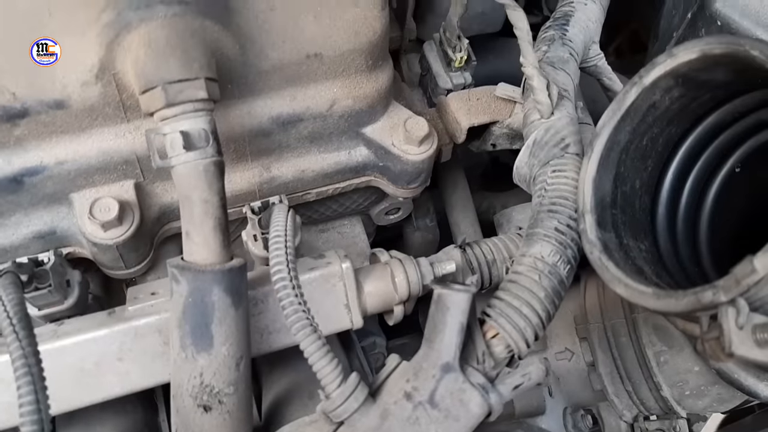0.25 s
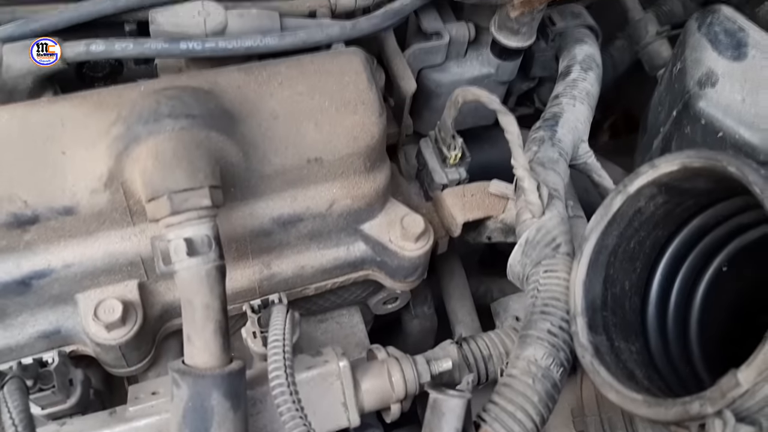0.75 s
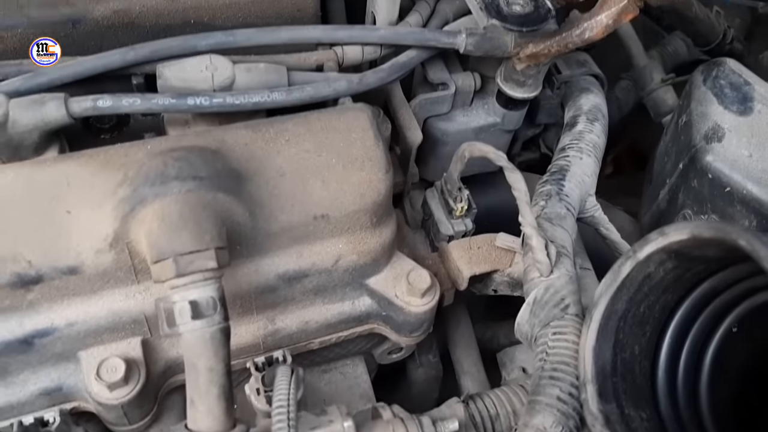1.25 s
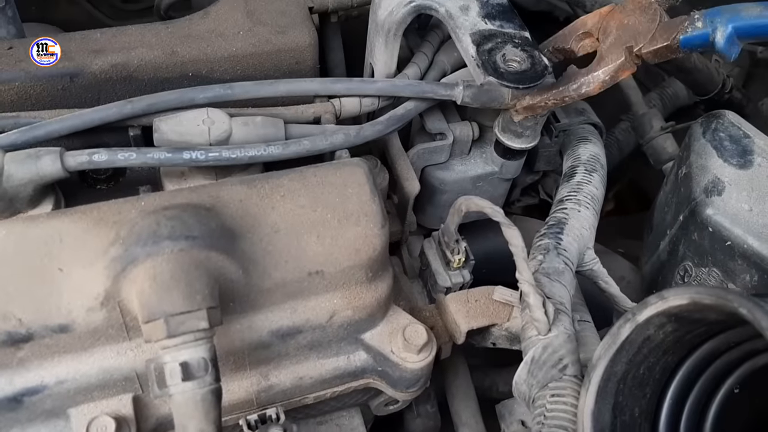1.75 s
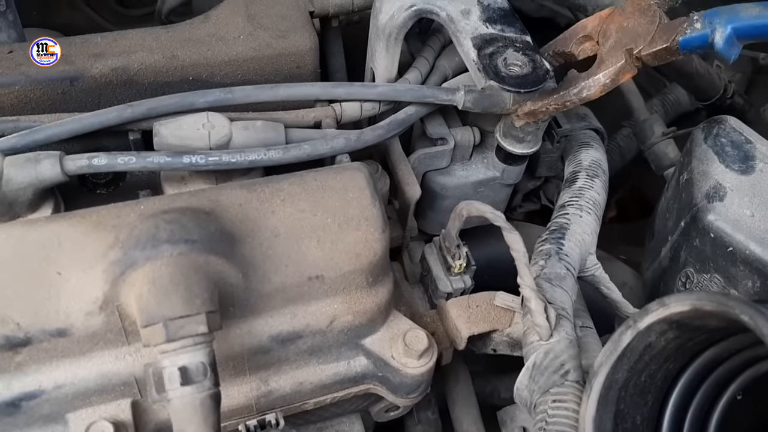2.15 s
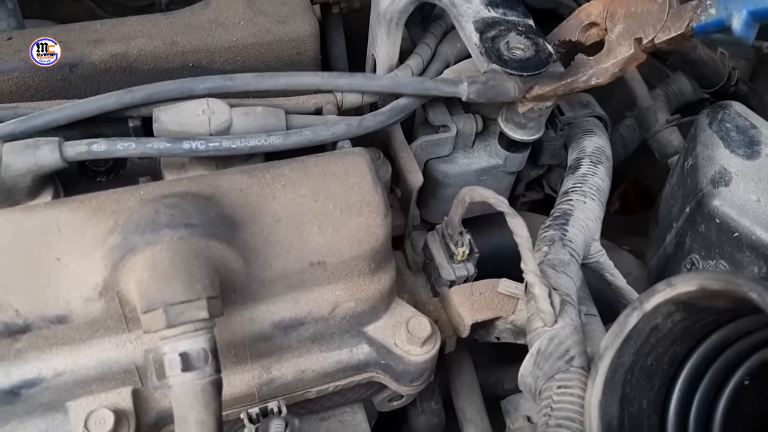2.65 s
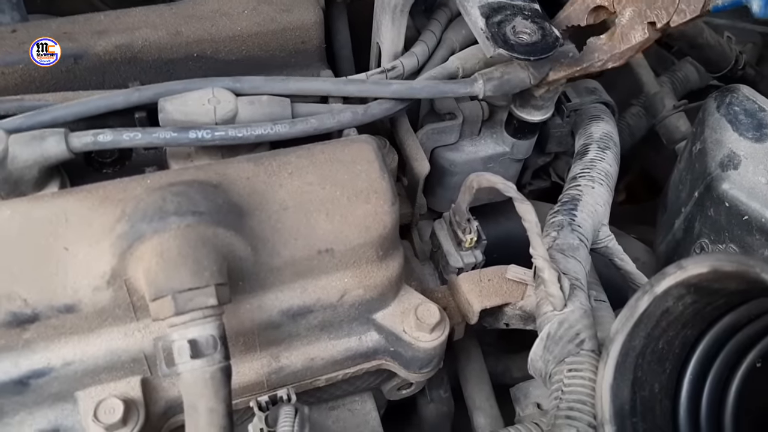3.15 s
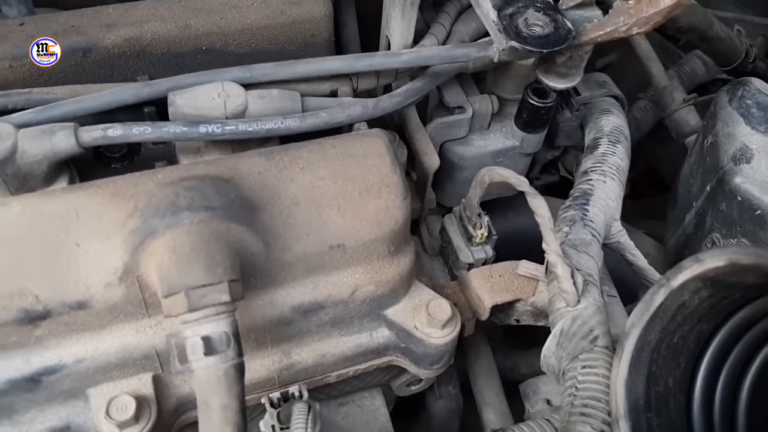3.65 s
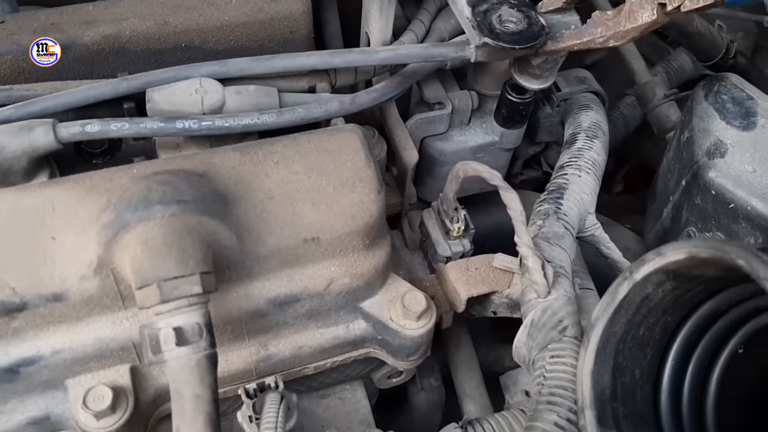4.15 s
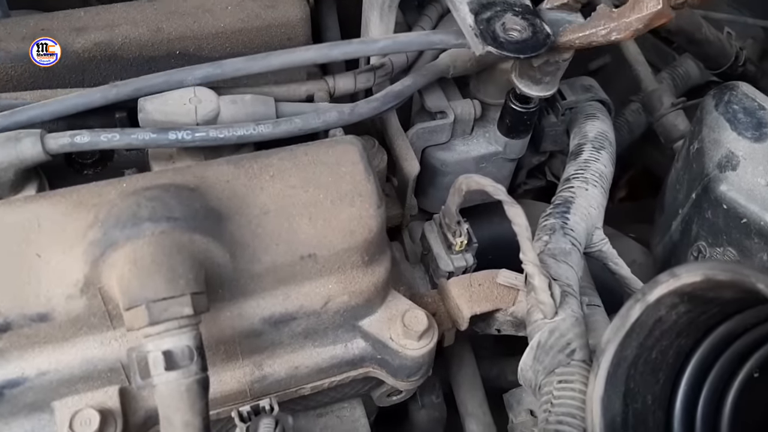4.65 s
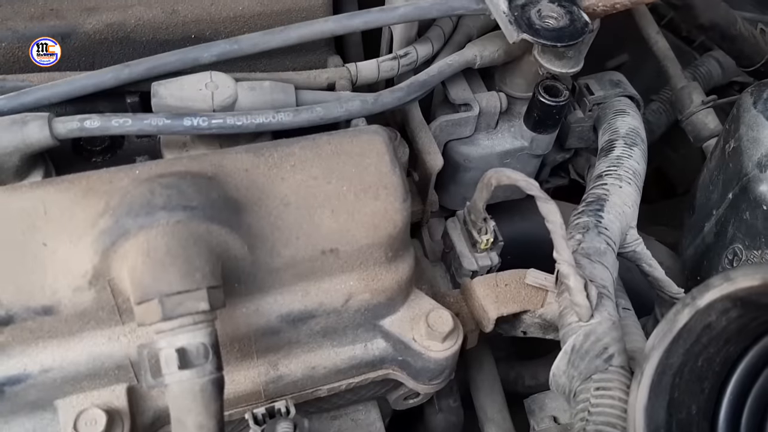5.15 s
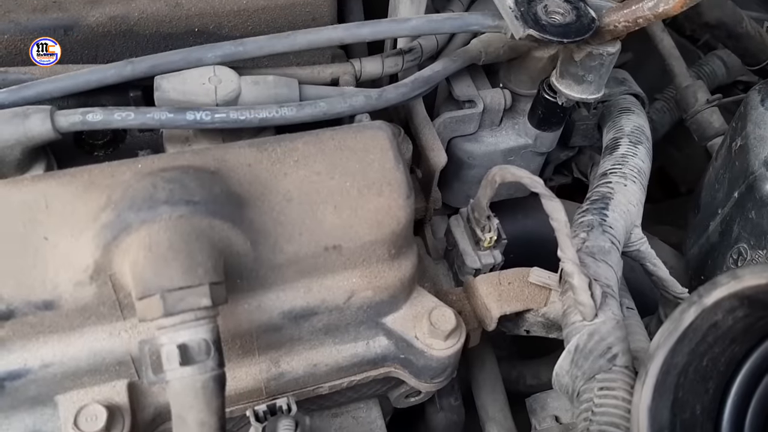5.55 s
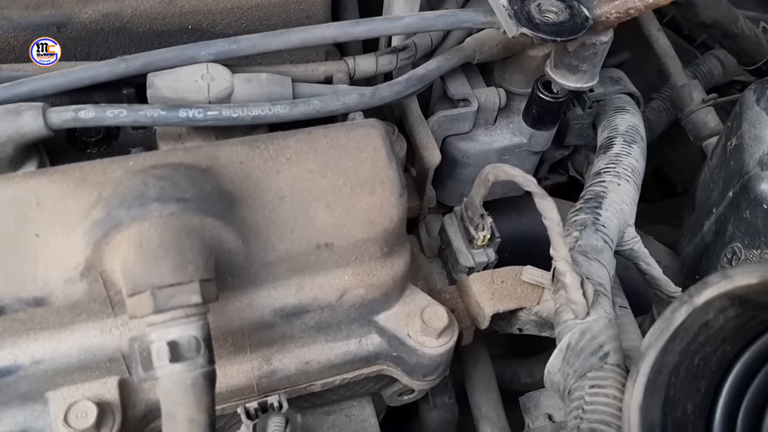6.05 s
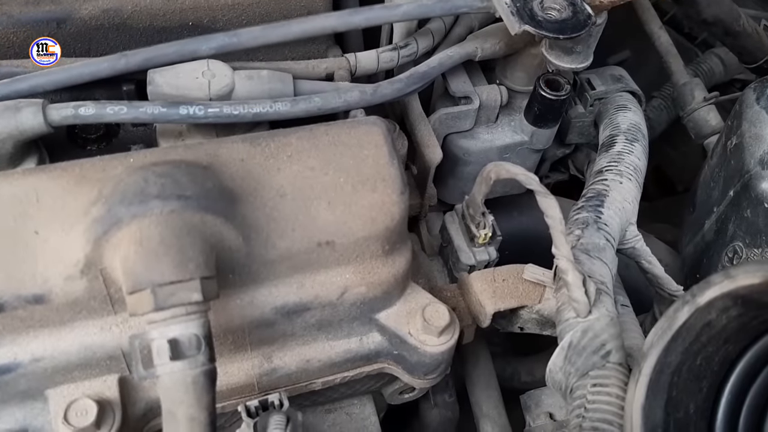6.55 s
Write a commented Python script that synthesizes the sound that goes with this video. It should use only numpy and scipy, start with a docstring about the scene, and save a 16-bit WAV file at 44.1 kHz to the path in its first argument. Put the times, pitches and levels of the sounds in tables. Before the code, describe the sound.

Heard close over an open engine bay, a car engine idles with airy belt noise, light valve knocks and quick injector ticks. Some hollow knocks sound early on. Midway there is a small metallic clink of pliers, followed at once by sharp, evenly spaced cracks of a spark jumping from a loose plug lead. The snapping carries on over the softening idle, which sags a little towards the end.

```python
"""Idling engine with a sparking plug lead.

A four-cylinder petrol engine idles under its open bonnet, heard close above the rocker cover.
Belts and air rush, an accessory hums, valves knock; injectors tick four to a cycle, one of them faint.
A hollow part is bumped now and then. Pliers slip off the boot as a plug lead is pulled off the coil,
and from then on a spark snaps across the gap about twice a cycle."""
import sys
import numpy as np
from scipy import signal
from scipy.fft import rfft, irfft
from scipy.io import wavfile
from scipy.ndimage import uniform_filter1d

SR = 44100
rng = np.random.default_rng(int(sys.argv[2]) if len(sys.argv) > 2 else 0)


def waveform_to_disk(signal):
    """Save audio, clipped to [-1, 1], as 16-bit WAV at the path in sys.argv[1]."""
    frames = np.transpose(np.atleast_2d(signal))
    scaled = np.clip(frames, -1, 1) * 32767
    samples = np.round(scaled).astype(np.int16)
    wavfile.write(sys.argv[1], SR, samples)


N = 299880
T = np.arange(N) / SR
F = np.fft.rfftfreq(N, 1 / SR)
RING_T = T[:int(.12 * SR)]

# Left-right likeness of the noise. Each row: frequency in Hz, coherence 0-1.
COHERENCE = [(30, .72), (70, .94), (150, .9), (600, .93), (1400, .52), (2500, .55), (4500, .38), (9000, .6),
             (16000, .72)]
# Engine speed. Each row: time in seconds, crank speed in rpm.
CRANK_RPM = [(0, 887.6), (1.2, 872.0), (2.5, 842.2), (3.5, 842.1), (5.0, 847.8), (5.8, 852.5), (6.0, 772.4),
             (6.3, 803.5), (6.8, 765.0)]
# Idle levels. Each row: time in seconds, then rush, rumble and rocker cover in dB.
IDLE_LEVELS = [(0, -30, -49, -38), (0.45, -31.5, -47.5, -44), (0.6, -31.8, -49, -40),
               (1.25, -32, -51.5, -42), (1.55, -30.5, -49.5, -43.5), (2.0, -30.5, -50, -37),
               (2.4, -30.5, -49.5, -39.5), (3.0, -30.5, -50, -41), (3.6, -31, -53, -39),
               (3.85, -33, -53, -42.5), (4.35, -36, -61, -45.5), (5.2, -36, -55.5, -46),
               (6.05, -36, -62, -47), (6.45, -36, -52, -41), (6.8, -38, -58, -44)]
# Belt and air noise. Each row: frequency in Hz, relative density in dB.
RUSH_SPECTRUM = [(150, -47), (250, -12.5), (445, -4), (495, -2.5), (559, -12.5), (794, 2), (1600, 2),
                 (2040, 0.5), (3510, -5), (5170, -12.5), (7330, -3.5), (8580, -24), (9500, -10),
                 (12000, -10.5), (15300, -14), (16000, -40)]
# Low engine noise. Each row: frequency in Hz, relative density in dB.
RUMBLE_SPECTRUM = [(15, -57), (25, -40), (48, -67), (68, -25), (81, -11), (146, -8), (251, -8), (275, -9.5),
                   (350, -1), (460, -30), (770, -120)]
# Panels ringing in the rush. Each row: frequency in Hz, width in Hz, level in dB re the rush.
PANEL_MODES = [(2840, 200, -15), (4050, 190, -7), (5030, 160, -14), (9280, 64, -25), (7700, 200, -15)]
# Intake boom swells. Each row: centre in seconds, level in dB, half-width in seconds.
BOOM_SWELLS = [(.19, -32.5, 0.033), (0.39, -41, 0.037), (1.74, -41.5, 0.055), (2.184, -40, 0.094),
               (4.55, -43, 0.041), (5.09, -60, 0.051), (6.472, -46, 0.083), (6.653, -58.5, .04)]
# Accessory tones. Each row: frequency in Hz, relative level in dB.
HUM_TONES = [(500.7, 1), (251, -15.5)]
# Valve knocks and firings. Each row: share of the cycle, length in seconds, frequency in Hz,
# width in Hz, relative level in dB.
BLOCK_KNOCKS = [(0.1224, 0.0054, 1014, 360, -4), (0.093, 0.012, 1330, 190, -10.5),
                (0.109, 0.0079, 2100, 260, -6), (.15, 0.019, 1750, 560, -7), (0.259, 0.015, 854, 220, -8.5),
                (0.321, 0.011, 1360, 280, -10), (0.44, 0.0081, 810, 180, -11),
                (0.588, 0.012, 1280, 240, -7.5), (0.45, 0.055, 97, 49, -31.5), (0.882, 0.034, 200, 34, -28)]
# Injectors in firing order. Each row: share of the cycle, level in dB re the rush, treble gain in dB.
INJECTOR_TICKS = [(0.001, 8, -3.5), (0.236, 6.5, -3), (.5, -1, -14), (0.753, 6.5, -2.1)]
# Fuel rail and clips, mid and treble. Each row: frequency in Hz, width in Hz, relative level in dB.
RAIL_MID_MODES = [(3870, 670, -3.5), (4596, 163, 4.5), (5125, 190, 0), (5360, 660, -3), (6200, 160, -2),
                  (7300, 410, -1)]
RAIL_TREBLE_MODES = [(10150, 640, 8), (12030, 1900, 5), (9800, 3200, -4), (12500, 690, 5),
                     (13700, 480, 2.5)]
# Blows on the hollow part. Each row: time in seconds, level in dB, shell gain in dB.
BLOWS = [(0.151, 0, -7), (0.157, -3, -14), (0.166, -18, 0), (0.176, -17, -4), (0.189, -7, -19),
         (0.196, -24, -13), (0.229, -17, -15), (0.235, -14, -17), (0.407, -19.5, -25), (0.493, -13, -13.5),
         (0.849, -22.5, -15), (1.689, -46, -5), (1.729, -21.5, -14), (2.217, -20, -19),
         (3.548, -21.5, -6.5), (6.439, -19, -14), (6.456, -21, -18), (6.486, -20, -18), (6.644, -21, -16),
         (6.669, -24, -14)]
# Hollow part, its shell, the pliers. Each row: frequency in Hz, relative level in dB, T60 in seconds.
HOLLOW_MODES = [(371, -9, 0.038), (446, -4.5, 0.037), (399.5, -11.5, 0.06), (543, -8, 0.018)]
SHELL_MODES = [(676, 7.5, 0.018), (910, 14.5, 0.017), (1127, -0.5, 0.063), (1292, -1, 0.045),
               (1770, -10, 0.047)]
PLIERS_MODES = [(4650, 0, .03), (3900, -2, .022), (3500, -3, .022), (2800, -4, .022)]
# Sparks in the open gap. Each row: start in seconds, coil ring level in dB, snap level in dB.
DISCHARGES = [(3.606, -10, -13.5), (3.678, -10, -15.5), (3.7486, -12.5, -17.5), (3.8211, -14.5, -15.5),
              (3.8913, -13.5, -17), (3.9633, -13, -17.5), (4.033, -15.5, -17), (4.1056, -16.5, -17.5),
              (4.1758, -14, -17.5), (4.248, -16, -15.5), (4.3178, -13.5, -18), (4.3896, -16, -21.5),
              (4.4592, -15.5, -22.5), (4.5323, -16.5, -18), (4.6013, -15.5, -24), (4.674, -13, -21),
              (4.7438, -17, -23), (4.816, -13.5, -19), (4.8848, -12.5, -13.5), (4.9574, -12, -14),
              (5.0268, -15, -19), (5.0986, -12.5, -16), (5.1677, -12, -17), (5.2393, -12.5, -19),
              (5.309, -13, -17), (5.3806, -11, -18), (5.4505, -16, -19.5), (5.5216, -11.5, -13.5),
              (5.5909, -9, -16), (5.6623, -11.5, -24), (5.7325, -16.5, -24), (5.8038, -12, -18.5),
              (6.0261, -14, -24.5), (6.1018, -12.5, -21.5), (6.1777, -16, -24.5), (6.253, -9.5, -17),
              (6.3285, -11.5, -19.5), (6.4037, -12, -19.5), (6.4805, -11, -16), (6.5574, -10, -11),
              (6.6334, -12.5, -14.5), (6.7091, -10.5, -19), (6.7863, -14.5, -18.5)]
# Coil tower, engine bay, gap. Each row: frequency in Hz, relative level in dB, T60 in seconds.
COIL_MODES = [(2954, 0.5, 0.035), (2890, -4, 0.028), (3290, -23, 0.058), (2820, -53, 0.0078),
              (3560, -11, 0.03)]
BAY_MODES = [(846, -1, 0.02), (1210, -19, 0.07), (1916, -0.5, 0.02), (2280, -17, 0.044)]
GAP_MODES = [(7220, -3.5, 0.033), (8810, -1.5, 0.018), (9120, -10.5, 0.041), (11100, -21, 0.0086),
             (14300, 0, 0.013), (15140, -7.5, 0.0082)]

RIGHT_LAG_S, TOP_HZ = 0.0003426, 16400
BOOM_DB, HUM_DB, HUM_FOLLOW = -18, -47, 0.51
KNOCK_DB, THROB_DB = 8, -28
SNAP_DB, BAY_DB, BAY_FADE_DB_PER_S = 11, -23, 2.5  # the bay rings less as the gap widens


def undb(db):
    return 10 ** (np.asarray(db) / 20)


def unit_rms(x):
    return x / np.sqrt(np.mean(x ** 2))


def spectrum(table):
    """A (Hz, value) table interpolated over log frequency."""
    hz, value = np.transpose(table)
    return np.interp(np.log(F + 1), np.log(hz), value)


def stereo_noise():
    """White noise, partly shared; the shared part reaches the right side later."""
    coherence = np.clip(spectrum(COHERENCE), 0, 1)
    left, own = rfft(rng.standard_normal((2, N)))
    right = coherence * left * np.exp(-2j * np.pi * F * RIGHT_LAG_S) + np.sqrt(1 - coherence ** 2) * own
    return irfft(np.array([left, right]), N)


def resonate(x, hz, width_hz):
    return signal.lfilter(*signal.iirpeak(hz, hz / width_hz, SR), x)


def noise_band(hz, width_hz):
    return resonate(stereo_noise(), hz, width_hz)


def highpass(x, hz, order):
    return signal.sosfilt(signal.butter(order, hz, "high", fs=SR, output="sos"), x)


def drift(rate_hz):
    """Random steps, smoothed twice; RMS near 1."""
    hold = int(SR / rate_hz)
    steps = np.repeat(rng.standard_normal(N // hold + 1), hold)
    return 1.29 * uniform_filter1d(uniform_filter1d(steps, hold), hold)[:N]


def add(track, start_s, sound):
    i = int(start_s * SR)
    if 0 <= i < N:
        track[..., i:i + sound.shape[-1]] += sound[..., :N - i]


def ring(modes, detune, phase=None):
    """Decaying modes, randomly detuned; signs alternate unless a phase is given."""
    hz, db, t60_s = np.transpose(modes)
    if phase is None:
        phase = np.pi * np.arange(len(hz))
    hz = hz * (1 + detune * rng.standard_normal(len(hz)))
    t = RING_T[:, None]
    return (undb(db) * np.exp(-np.log(1000) * t / t60_s) * np.sin(2 * np.pi * hz * t + phase)).sum(axis=1)


def soft_onset(sound):
    return sound * (1 - np.exp(-(RING_T / 0.0026) ** 2))


def cycles():
    """Running cycle count, two crank turns each."""
    rpm = np.interp(T, *np.transpose(CRANK_RPM))
    return -.193 + np.cumsum(rpm) / (2 * 60 * SR)


def cam_times(share):
    """Times in seconds at which each cycle reaches this share."""
    run = cycles()
    reached = np.arange(np.floor(run[0]), run[-1]) + share
    return np.interp(reached[(reached > run[0]) & (reached < run[-1])], run, T)


def bursts(times_s, db, length_s, scatter_db):
    """Envelope of uneven bursts: quick rise, slower fall."""
    t = T[:int(4 * length_s * SR)] / length_s
    shape = (2 * t * np.exp(1 - 2 * t)) ** 2
    out = np.zeros(N)
    for start_s, gain in zip(times_s, undb(db + scatter_db * rng.standard_normal(len(times_s)))):
        add(out, start_s, gain * shape)
    return out


def flickering_noise(table, low_hz, bands, flicker_db):
    """Shaped noise in half-octave bands that flicker independently."""
    shaped = rfft(stereo_noise()) * undb(spectrum(table))
    out = 0
    for k in range(bands):
        octaves = np.log2((F + 1) / low_hz) - k / 2
        band = irfft(shaped * np.clip(1 - 2 * abs(octaves), 0, 1), N)
        out = out + undb(flicker_db * drift(14)) * band
    return unit_rms(out)


def rumble(rumble_db):
    """Low engine noise of wandering level."""
    noise = flickering_noise(RUMBLE_SPECTRUM, low_hz=28, bands=9, flicker_db=0.5)
    return noise * undb(rumble_db + 1.8 * drift(4.93))


def accessory_hum(rush_db):
    """Two tones whose level partly follows the rush."""
    tones = sum(undb(db) * np.sqrt(2) * np.sin(2 * np.pi * hz * T + 0.31 * drift(8.6))
                for hz, db in HUM_TONES)
    return tones * undb(HUM_DB + HUM_FOLLOW * (rush_db - rush_db[0]) + 1.5 * drift(6))


def intake_boom(rush_db):
    """Narrow intake resonance that swells now and then."""
    swells = sum(undb(db) * np.exp(-((T - at_s) / width_s) ** 2) for at_s, db, width_s in BOOM_SWELLS)
    envelope = (undb(rush_db + BOOM_DB) + swells) * undb(2.7 * drift(9.9))
    return envelope * unit_rms(resonate(noise_band(381, 57), 389.6, 72))


def rocker_cover(cover_db):
    """Noise in the cover's broad midrange resonance."""
    return undb(cover_db + 2.2 * drift(7)) * unit_rms(resonate(noise_band(800, 150), 729, 240))


def rush(rush_db):
    """Belts, air and bearings; panels ring in their noise."""
    air = flickering_noise(RUSH_SPECTRUM, low_hz=255, bands=13, flicker_db=1.5)
    panels = sum(undb(db) * unit_rms(noise_band(hz, width_hz)) for hz, width_hz, db in PANEL_MODES)
    return (air + panels) * undb(rush_db)


def block_knocks(rush_db):
    """Valves seat and cylinders fire at fixed points of the cycle."""
    knocks = 0
    for share, length_s, hz, width_hz, db in BLOCK_KNOCKS:
        envelope = bursts(cam_times(share), db + KNOCK_DB, length_s, scatter_db=2)
        band = noise_band(hz, width_hz)
        wavering_tone = band / np.sqrt(uniform_filter1d(band ** 2, int(SR / hz)) + 1e-18)
        knocks = knocks + envelope * wavering_tone
    throb = np.sin(2 * np.pi * 4 * 3 * cycles() + drift(9))  # 3 x the firing rate
    return (knocks + undb(THROB_DB + 2 * drift(7.9)) * throb) * undb(rush_db)


def injectors(rush_db):
    """Each needle rattles briefly and excites the rail and its clips; the colour varies per tick."""
    out = 0
    for modes, is_treble in ((RAIL_MID_MODES, False), (RAIL_TREBLE_MODES, True)):
        rattle = sum(
            bursts(cam_times(share) - .0025, db + treble_db * is_treble, length_s=0.0088, scatter_db=1.26)
            for share, db, treble_db in INJECTOR_TICKS)
        rail = sum(undb(db + 2.6 * drift(33)) * noise_band(hz, width_hz) for hz, width_hz, db in modes)
        out = out + rattle * unit_rms(rail)
    return out * undb(rush_db)


def bumps():
    """Soft blows ring a hollow part and the higher modes of its shell."""
    out = np.zeros(N)
    for at_s, db, shell_db in BLOWS:
        body = ring(HOLLOW_MODES, detune=.025) + undb(shell_db) * ring(SHELL_MODES, detune=.025)
        add(out, at_s - .001, undb(db) * soft_onset(body))
    return out


def pliers(start_s, db):
    """Pliers slip off the boot and clink."""
    out = np.zeros(N)
    add(out, start_s, undb(db) * soft_onset(ring(PLIERS_MODES, detune=0, phase=0)))
    return out


def sparks():
    """A pressure snap, the ring of gap, coil tower and bay, and short echoes off nearby metal."""
    out, t = np.zeros((2, N)), RING_T
    snap = -np.exp(-((t - .0003) / .000024) ** 2) + .25 * np.exp(-((t - .00022) / .00005) ** 2)
    build_up = 1 - np.exp(-t / .0008)  # the cavity takes a few swings
    echo_decay = np.exp(-t / 0.0011) + 0.2 * np.exp(-t / 0.01)
    scatter_db = rng.standard_normal((len(DISCHARGES), 2)) * [2.5, 0.2]
    for (start_s, coil_db, snap_db), (bay_scatter_db, pan_db) in zip(DISCHARGES, scatter_db):
        bay_db = BAY_DB - BAY_FADE_DB_PER_S * (start_s - DISCHARGES[0][0]) + bay_scatter_db
        roughness = signal.lfilter([.3], [1, -.95], rng.standard_normal((2, len(t))))
        bay = undb(-29) * snap + ring(BAY_MODES, detune=0.055)
        for side in (0, 1):
            echoes = np.diff(rng.standard_normal(len(t) + 1)) * echo_decay
            gap = ring(GAP_MODES, detune=0.032, phase=2.44 * rng.standard_normal(len(GAP_MODES)))
            bright = undb(SNAP_DB) * snap + gap * (1 + .7 * roughness[1 - side]) + undb(-17) * echoes
            coil = build_up * ring(COIL_MODES, detune=.009, phase=1.2 * side)
            coil *= 1 + .25 * roughness[side]
            spark = undb(coil_db) * coil + undb(snap_db) * bright + undb(bay_db) * bay
            add(out[side], start_s, undb(pan_db * (-0.5 - side)) * spark)
    out -= 0.54 * resonate(out, 4430, 3900)  # lead and boot shade this band
    return highpass(out, 450, order=2)


def scene():
    times_s, *levels_db = np.transpose(IDLE_LEVELS)
    rush_db, rumble_db, cover_db = (np.interp(T, times_s, db) for db in levels_db)
    engine = rush(rush_db) + intake_boom(rush_db) + accessory_hum(rush_db) + rumble(rumble_db)
    engine += rocker_cover(cover_db) + block_knocks(rush_db) + injectors(rush_db)
    sparking = sparks()
    handling = highpass(bumps() + pliers(start_s=3.5865, db=-13), 260, order=4)  # too small for bass
    return engine + sparking + handling * undb([[-.8], [.8]])


def record(dry):
    """Soft-clip the peaks, cut the top."""
    rounded = np.tanh(0.81 * dry) / 0.81
    return signal.sosfilt(signal.ellip(10, .2, 80, TOP_HZ, fs=SR, output="sos"), rounded)


dry = scene()
out = record(dry)
waveform_to_disk(out)
```